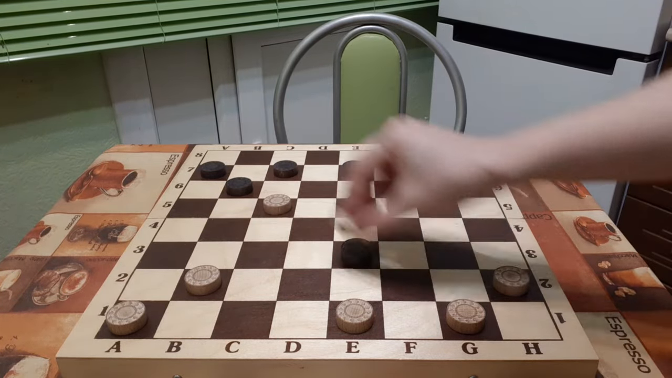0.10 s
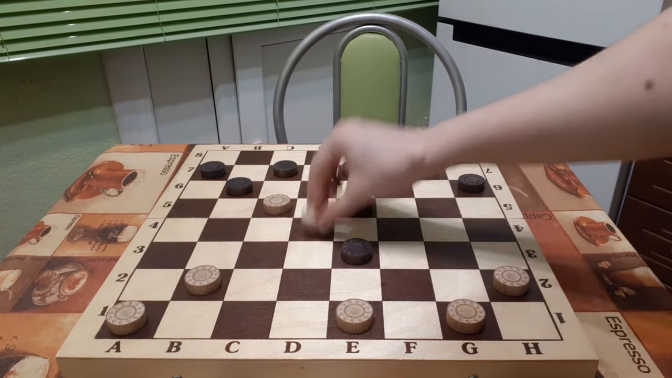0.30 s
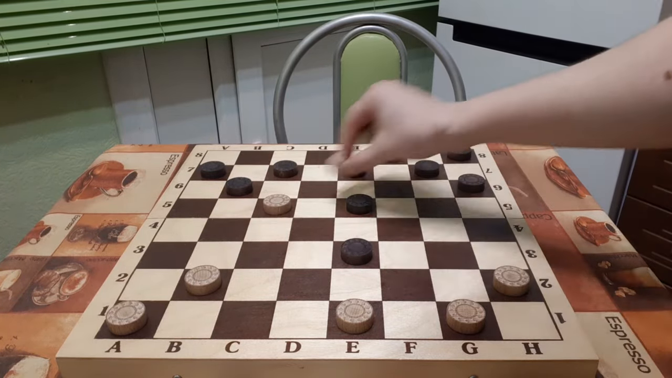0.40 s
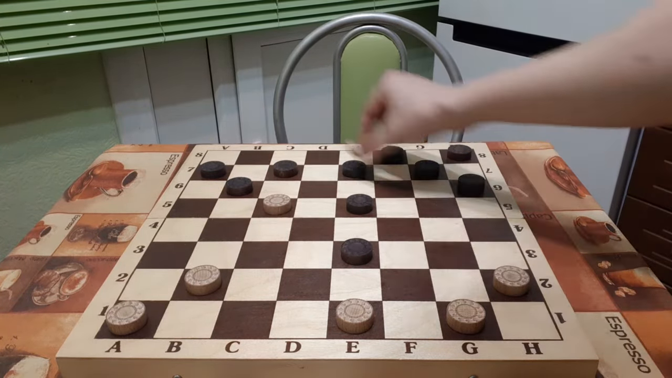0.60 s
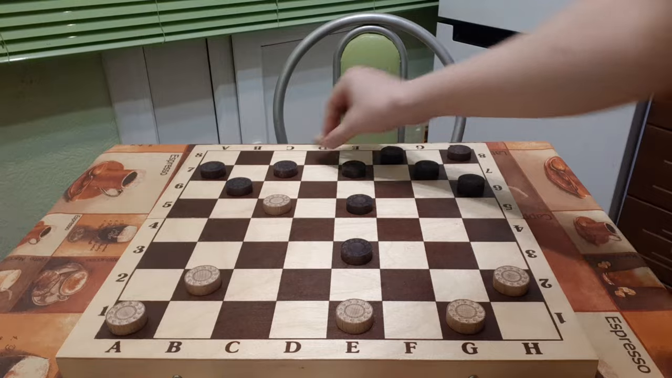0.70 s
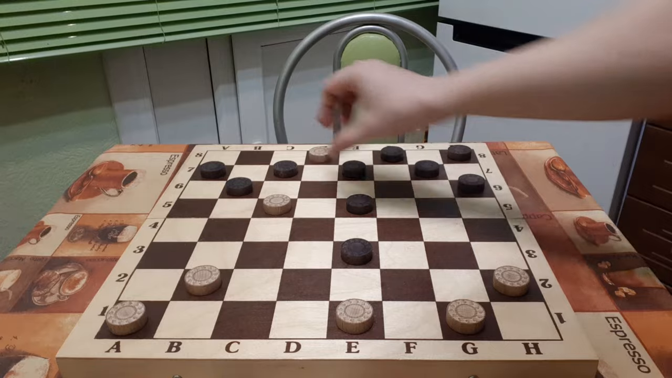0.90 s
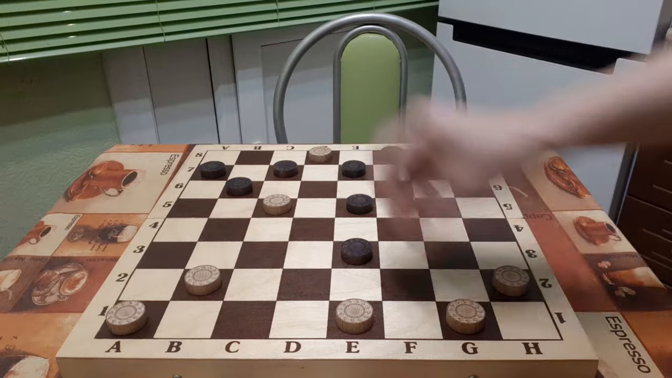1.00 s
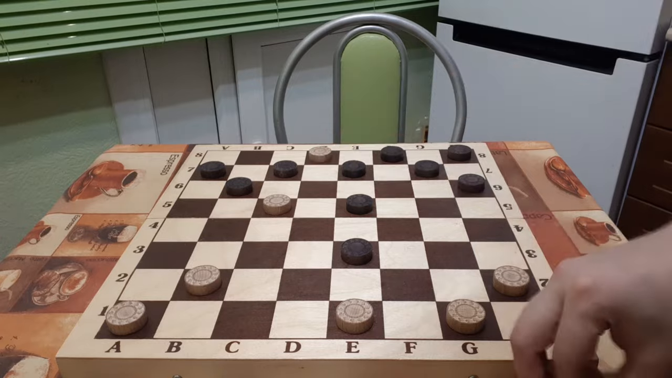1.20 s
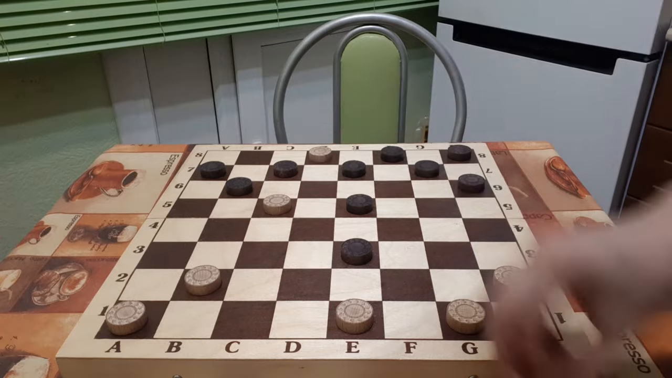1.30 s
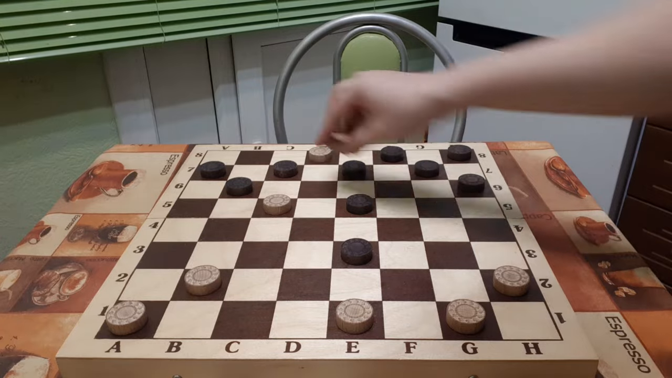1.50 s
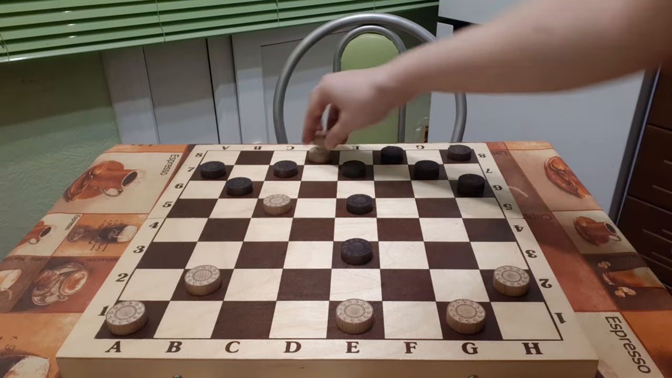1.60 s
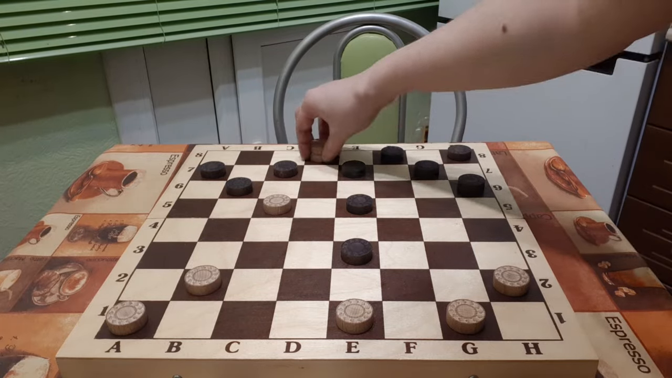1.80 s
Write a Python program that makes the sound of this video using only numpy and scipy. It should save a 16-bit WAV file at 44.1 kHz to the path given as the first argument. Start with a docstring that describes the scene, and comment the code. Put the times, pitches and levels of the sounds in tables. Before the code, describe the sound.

Sharp wooden clacks of game pieces slapped on a board in a small, hard-walled kitchen

```python
"""Wooden draughts pieces are slapped on a wooden board in a small hard-walled kitchen, caught by a phone.
Each contact is a shaped click plus short fading sines for the ringing piece; slower sines are the thuds of
the board and the rocking table. Decaying noise smears each clack into a dense room tail.
Underneath lie a fridge-like hum of narrow noise bands and a shaped noise floor of rumble and faint hiss."""
import sys
import numpy as np
from scipy import signal
from scipy.fft import rfft, irfft
from scipy.io import wavfile

SR = 44100
rng = np.random.default_rng(int(sys.argv[2]) if len(sys.argv) > 2 else 0)


def bounce(signal):
    """Save signal as a 16-bit WAV file at the path given by the first command-line argument."""
    frames = np.transpose(np.atleast_2d(signal))
    limited = np.clip(frames, -1, 1)
    pcm = np.round(limited * 32767).astype(np.int16)
    wavfile.write(sys.argv[1], SR, pcm)


def elevation(decibels):
    """Turn decibel levels (scalar or array-like) into linear amplitude ratios."""
    levels = np.asarray(decibels, float)
    return 10 ** (levels / 20)


N = 83790  # samples
LEAD_S = 0.1  # run-up before t = 0, so that earlier contacts leave their tails
TAIL_S = 0.5  # length of each thud and room tail


def curve(table, hz):
    """Read a (f/Hz, value) table on a log frequency axis."""
    points = np.array(table, float)
    return np.interp(np.log(np.maximum(hz, 1)), np.log(points[:, 0]), points[:, 1])


def causal(db):
    """Minimum-phase click with a given dB spectrum: its energy comes as early as it can."""
    cepstrum = irfft(db * np.log(10) / 20)
    half = len(cepstrum) // 2
    cepstrum[1:half] *= 2
    cepstrum[half + 1:] = 0
    return irfft(np.exp(rfft(cepstrum)))


def ring(t, hz, db, t60_s):
    """A sine that fades by 60 dB in t60_s, as a struck mode does."""
    return elevation(db - 60 * t / t60_s) * np.sin(2 * np.pi * hz * t)


def spread(mid, side, hz):
    """Turn two spectra into stereo: alike in the bass, unrelated above 900 Hz."""
    width = np.clip(hz / 900, 0.1, 1)
    left_right = mid + width * side * np.array([[1], [-1]])
    return irfft(left_right / np.sqrt(1 + width ** 2))


def add(out, x, s):
    """Mix x in at time s."""
    start = int(round((s + LEAD_S) * SR))
    n = min(x.shape[-1], out.shape[1] - start)
    out[:, start:start + n] += x[..., :n]


# Contacts of the pieces: (t/s, level/dB, piece pitch f/Hz, crack tilt/dB per octave, ring t60/s,
# room send/dB)
CLACKS = [(-.040, -7, 4600, -10.5, 0.0046, -1.5), (0.2482, 9, 5080, -0.5, 0.0094, -1),
          (.2510, 4, 4570, 1, 0.0093, 1), (0.4963, -0.5, 5300, -4, 0.0079, 2.5),
          (0.4986, 4.5, 4840, 1, 0.0032, 4), (.5028, -0.5, 4670, 2.5, .012, 2.5),
          (.5095, -7, 4800, 0.5, 0.03, 4.5), (.5145, 1, 5000, -2, 0.0048, 3),
          (0.7614, 4.5, 3046, -1.5, 0.0048, -2), (.7652, 3.5, 4446, 0, 0.031, -2),
          (1.177, -61, 4500, -4, 0.0062, 4), (1.2065, -47, 3800, -5, 0.014, 1),
          (1.2158, -38, 5210, -4.5, .014, -2.5), (1.2172, -37.5, 4160, -3.5, 0.014, -2.5),
          (1.230, -38.5, 4390, -8.5, 0.0058, 1), (1.6888, -21.5, 4540, -5.5, 0.0146, 7.5),
          (1.699, -20.5, 4100, -5.5, 0.014, 2), (1.712, -22, 4380, -7, 0.0072, 4)]
# Partials of a piece: (ratio to piece pitch, level/dB, share of ring t60)
PIECE = [(1, -0.5, 0.75), (1.38, -9, 1.4), (.7, -5.5, 0.96), (1.74, -11.5, 0.72), (0.29, -18, 1.3),
         (0.47, -15.5, .8)]
# Spectrum shape of the crack before tilting: (f/Hz, level/dB)
CRACK = [(60, -61), (200, -27.5), (500, -15.5), (1000, -9.5), (2000, -5.5), (4000, 3.5), (6500, 3),
         (8500, -4.5), (11000, -6.5), (15500, -9.5)]
RING_DB = -18  # piece partials against the contact level
NEAR_RING_DB = 6  # extra ring in the direct sound
SOFT_HZ = 6360  # the crack tilt is twice as steep above this
LEFT_LAG = 3  # samples by which direct sound reaches the left channel later


def clacks(out):
    """Crack and ring of a piece; the ring beams toward the phone, and the room returns both."""
    t, hz = np.arange(2048) / SR, np.fft.rfftfreq(2048, 1 / SR)
    # octaves above 4 kHz, counted double above SOFT_HZ
    octaves = np.log2(np.maximum(hz, 100) / 4000) + np.log2(np.maximum(hz / SOFT_HZ, 1))
    for s, db, pitch_hz, tilt_db, ring_s, send_db in CLACKS:
        crack = causal(curve(CRACK, hz) + tilt_db * octaves)
        crack = elevation(db) * crack / np.linalg.norm(crack)
        piece = np.zeros(len(t))
        for ratio, partial_db, share in PIECE:
            piece += ring(t, pitch_hz * ratio, db + RING_DB + partial_db, share * ring_s)
        near = crack + elevation(NEAR_RING_DB) * piece
        add(out, np.array([np.roll(near, LEFT_LAG), near]), s)
        reverb = signal.fftconvolve(room() * elevation(send_db), (crack + piece)[None])
        add(out, reverb, s)


# Thuds into board and table: (t/s, level/dB, centre of the favoured pitch region f/Hz)
THUDS = [(-.030, -22.5, 202), (.030, -41, 560), (.085, -50, 520), (0.136, -45, 316), (.2490, -16, 245),
         (.5010, -18, 183.6), (.5060, -20, 480), (0.761, -27, 230), (1.207, -51, 199.6),
         (1.217, -46.5, 133.9), (1.223, -50.5, 270.2), (1.690, -43, 795), (1.699, -37, 290),
         (1.784, -44, 295), (1.875, -55, 254)]
# Modes of board and table: (f/Hz, level/dB, t60/s)
BOARD = [(136, -9.5, 0.44), (201, -2, .23), (232, 1, .07), (253, 0, 0.13), (276.6, -4.5, 0.17),
         (321, -13.5, 0.35), (400, -5.5, 0.11), (459.4, -6.5, 0.15), (550, -1, 0.06), (649, -5, .16),
         (744, -10, 0.13), (1040, -8, .12)]
REGION_DB = -19.5  # mode level one octave from the region, growing with the square of the distance
MODE_DETUNE, MODE_SCATTER_DB = 0.012, 1.5  # random spread of pitch (fraction) and level per thud
THUD_RISE_S = 0.0036
SWAY_HZ, SWAY_DB, SWAY_T60_S, SWAY_RISE_S = 37.8, -29.5, 0.6, 0.054  # level is against the thud


def thuds(out):
    """Board and table ring on their low modes while the table rocks on its legs."""
    t = np.arange(int(TAIL_S * SR)) / SR
    chance = rng.standard_normal((len(THUDS), len(BOARD), 3))
    thud_rise = (1 - np.exp(-t / THUD_RISE_S)) ** 2
    sway_rise = 1 - np.exp(-t / SWAY_RISE_S)
    for (s, db, region_hz), draws in zip(THUDS, chance):
        modes = np.zeros((2, len(t)))
        for (hz, mode_db, t60_s), (detune, scatter, lean) in zip(BOARD, draws):
            region_db = REGION_DB * np.log2(hz / region_hz) ** 2
            level_db = db + mode_db + region_db + MODE_SCATTER_DB * scatter
            mode = ring(t, hz * (1 + MODE_DETUNE * detune), level_db, t60_s)
            # left gains what right loses; the random lean grows with pitch
            pan_db = np.array([[1.0], [-1.0]]) * (0.3 + lean * hz / 400)
            modes += mode * elevation(pan_db)
        sway = ring(t, SWAY_HZ, db + SWAY_DB, SWAY_T60_S) * sway_rise
        add(out, modes * thud_rise + sway, s)


# Fade time of the room tail by pitch: (f/Hz, t60/s)
ROOM_T60 = [(150, 0.28), (400, 0.33), (1000, 0.33), (2500, 0.31), (5000, 0.28), (9000, .25), (15000, 0.19)]
ROOM_DB, ROOM_RISE_S = -21.5, 0.0019  # gain of the noise tail, build-up time
ROOM_GRAIN_DB = 5.5  # initial random spread of sample levels


def room():
    """Echoes as stereo noise, grainy at first, thickening into a tail that fades at its own rate per octave."""
    n = int(TAIL_S * SR) // 2 * 2
    t, hz = np.arange(n) / SR, np.fft.rfftfreq(n, 1 / SR)
    grain = elevation(ROOM_GRAIN_DB * np.exp(-t / 0.02) * rng.standard_normal((2, n)))
    noise = spread(*rfft(rng.standard_normal((2, n))), hz) * grain
    spectrum = rfft(noise)
    octave = np.clip(np.log2(np.maximum(hz, 1) / 60), 0, 8)
    tail = np.zeros((2, n))
    for k in range(9):
        share = np.clip(1 - np.abs(octave - k), 0, 1)  # overlapping octave bands from 60 Hz up
        fade = elevation(-60 * t / curve(ROOM_T60, 60 * 2.0 ** k))
        tail += irfft(spectrum * share) * fade
    return tail * (1 - np.exp(-t / ROOM_RISE_S)) * elevation(ROOM_DB)


def shaped_noise(gain, hz, db):
    """Steady stereo noise through a spectral gain, set to an rms level in dB."""
    mid, side = (rfft(rng.standard_normal((2, N))) * gain)
    noise = spread(mid, side, hz)
    return elevation(db) * noise / np.sqrt(np.mean(noise ** 2))


# Fridge-like tones: (f/Hz, full width at half amplitude/Hz, rms level/dB)
HUM = [(100, 0.67, -77.5), (158, 4.5, -72.5), (235.7, 12, -78.5), (301, 20, -73.5)]


def hum():
    """Low tones that waver because each is a narrow band of noise."""
    hz = np.fft.rfftfreq(N, 1 / SR)
    out = np.zeros((2, N))
    for tone_hz, width_hz, db in HUM:
        resonance = 1 / (1 + ((hz - tone_hz) / width_hz * 2) ** 2)
        out += shaped_noise(resonance, hz, db)
    return out


# Spectrum shape of rumble and hiss: (f/Hz, relative level/dB)
FLOOR = [(25, 5.5), (48, -3), (70, -16.5), (130, -3), (320, -0.5), (500, -12), (1100, -26.5), (3000, -33.5),
         (16000, -30)]


def noise_floor():
    """Rumble and faint hiss: one steady noise shaped by a spectrum curve."""
    hz = np.fft.rfftfreq(N, 1 / SR)
    return shaped_noise(elevation(curve(FLOOR, hz)), hz, -72.5)


def scene():
    """Clacks and thuds over the hum and the noise floor."""
    lead = int(LEAD_S * SR)
    out = np.zeros((2, N + lead))
    clacks(out)
    thuds(out)
    return out[:, lead:] + hum() + noise_floor()


def band_limit(x):
    """A steep low-pass at the top of the band."""
    return signal.sosfilt(signal.butter(12, 16600, fs=SR, output="sos"), x)


def record(dry):
    """The phone rounds the highest peaks toward a ceiling and thins the deep bass."""
    ceiling = 0.85  # of full scale
    rounded = dry / (1 + (dry / ceiling) ** 4) ** (1 / 4)
    bass_cut = signal.butter(2, 75, "high", fs=SR, output="sos")  # 75 Hz
    mix = signal.sosfilt(bass_cut, rounded)
    return band_limit(mix)


dry = scene()
out = record(dry)
bounce(out)
```